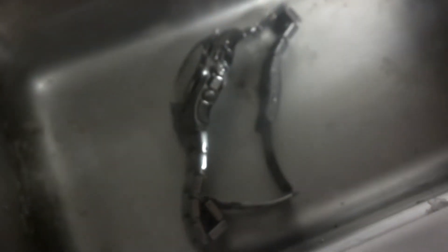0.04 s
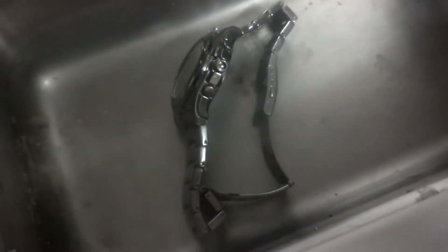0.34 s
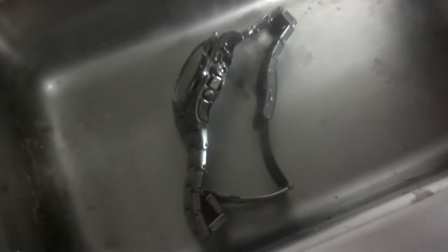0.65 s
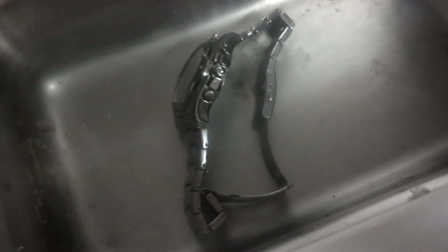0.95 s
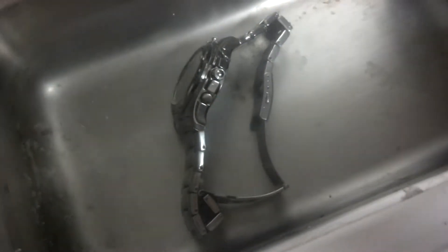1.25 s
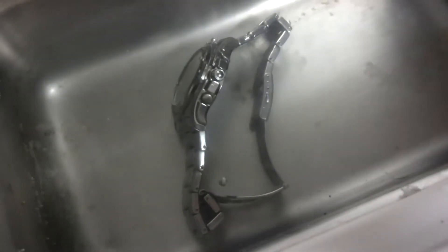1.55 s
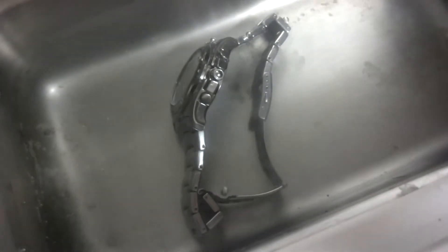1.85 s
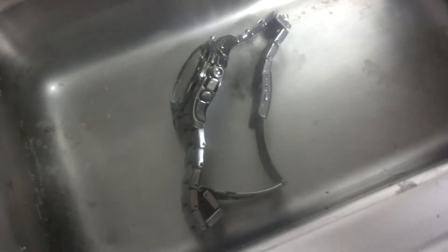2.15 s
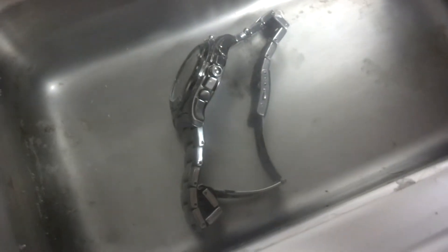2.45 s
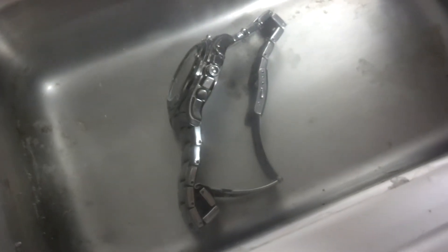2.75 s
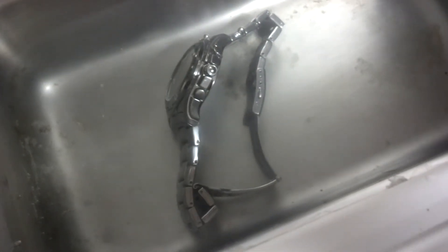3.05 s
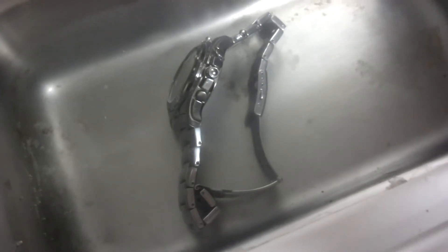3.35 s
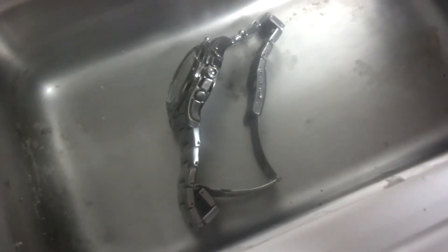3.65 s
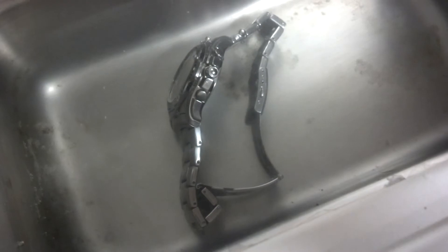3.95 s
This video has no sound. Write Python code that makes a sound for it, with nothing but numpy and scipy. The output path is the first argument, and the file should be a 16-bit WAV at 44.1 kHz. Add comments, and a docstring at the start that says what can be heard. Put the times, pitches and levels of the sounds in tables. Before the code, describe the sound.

Close above a water-filled steel tank indoors, an ultrasonic cleaner buzzes without a break while tiny bubbles hiss and crackle. A few faint ticks and brief sputters dot the buzz, the last tick landing with a small gurgle.

```python
"""An ultrasonic cleaner runs with a wristwatch in its steel tank, heard from just above the water.
From the start its drive surges twice per mains cycle: each surge gives a pressure pulse (the buzz) and
a burst of cavitation (crackle and high fizz), all wavering as the bubble cloud shifts. Larger bubbles
snap near 0.3 and 0.6 s, fainter ticks and brief sputters follow, and a last snap lands with a gurgle
near 3.7 s as the buzz runs on. Two close microphones, electronically widened."""
import sys
import numpy as np
from scipy import signal
from scipy.fft import rfft, irfft
from scipy.io import wavfile

SR = 44100
rng = np.random.default_rng(int(sys.argv[2]) if len(sys.argv) > 2 else 0)


def int16_out(signal):
    """Quantize to a 16-bit WAV file."""
    q = np.round(np.clip(np.atleast_2d(signal).T, -1, 1) * 32767)
    wavfile.write(sys.argv[1], SR, q.astype(np.int16))


N = 176400
TIME_S, FREQ_HZ = np.arange(N) / SR, np.fft.rfftfreq(N, 1 / SR)
SURGE_HZ, CAVITATION_PEAK_S = 120, 0.0019  # the drive's beat; where in each surge the bubbles peak

# Tone of one pressure pulse: frequency_hz, gain_db
PULSE_EQ = [(30, -71), (70, -35), (120, -2), (190, 9), (240, 5), (360, 2), (480, -2.5), (720, -13.5),
            (960, -20), (1320, -27), (1800, -35), (2600, -44), (5000, -71)]
# Fader ride on the pulse's round body: time_s, gain_db
BODY_RIDE = [(0.005, -40.0), (0.014, -29.5), (0.13, -28.5), (0.155, -36.5), (0.164, -47.5), (0.18, -31.0),
             (0.255, -30.0), (0.289, -29.0), (0.497, -30.0), (0.505, -38.5), (0.555, -31.0), (0.655, -32.0),
             (0.672, -38.5), (0.747, -28.5), (0.772, -30.5), (0.839, -27.5), (0.864, -33.5), (0.93, -28.5),
             (0.98, -31.5), (0.989, -40.5), (0.997, -30.5), (1.039, -27.5), (1.164, -38.5), (1.18, -31.0),
             (1.264, -28.5), (1.28, -33.5), (1.339, -29.5), (1.364, -33.5), (1.514, -30.0), (1.53, -27.0),
             (1.589, -33.5), (1.772, -26.5), (1.839, -29.0), (1.855, -38.5), (1.897, -27.5), (1.939, -36.5),
             (1.98, -30.5), (2.122, -28.0), (2.297, -32.0), (2.322, -37.5), (2.364, -28.0), (2.555, -34.0),
             (2.597, -30.0), (2.655, -34.5), (2.714, -30.5), (2.73, -33.5), (2.764, -29.5), (2.914, -39.0),
             (2.939, -29.0), (3.064, -28.5), (3.089, -35.5), (3.105, -25.5), (3.13, -34.0), (3.247, -31.0),
             (3.272, -34.5), (3.314, -26.5), (3.322, -31.5), (3.38, -29.0), (3.405, -34.0), (3.472, -26.5),
             (3.489, -34.0), (3.53, -31.0), (3.564, -34.0), (3.68, -28.5), (3.83, -32.5), (3.847, -26.0),
             (3.989, -33.0)]
# Fader ride on its sharp edge: time_s, gain_db
EDGE_RIDE = [(0.005, -44.5), (0.014, -38.5), (0.147, -36.5), (0.164, -53.5), (0.18, -39.5), (0.239, -40.5),
             (0.247, -52.0), (0.255, -39.0), (0.28, -45.5), (0.289, -32.0), (0.58, -35.5), (0.597, -46.0),
             (0.647, -34.0), (0.664, -45.0), (0.747, -33.0), (0.98, -38.0), (0.989, -49.5), (0.997, -33.0),
             (1.089, -34.0), (1.164, -44.5), (1.18, -33.5), (1.255, -32.0), (1.339, -41.0), (1.355, -34.5),
             (1.522, -33.5), (1.655, -37.5), (1.805, -34.5), (1.864, -39.0), (1.889, -35.5), (2.039, -33.5),
             (2.047, -44.5), (2.064, -29.5), (2.08, -36.5), (2.297, -34.0), (2.314, -45.0), (2.372, -32.5),
             (2.414, -45.5), (2.422, -35.0), (2.589, -39.0), (2.614, -50.5), (2.647, -37.0), (2.722, -41.5),
             (2.772, -32.5), (2.839, -38.5), (2.897, -47.5), (2.955, -35.0), (2.972, -45.5), (3.03, -37.5),
             (3.039, -42.5), (3.239, -35.5), (3.405, -42.0), (3.422, -35.5), (3.48, -41.5), (3.514, -34.0),
             (3.722, -41.0), (3.772, -39.0), (3.83, -46.5), (3.839, -38.0), (3.897, -47.0), (3.989, -44.5)]
# Bite of the edge's bright tip, against the rest of the edge: time_s, gain_db
TIP_RIDE = [(0, 6), (.45, 0), (1.3, -0.5), (1.85, -3.5), (2.2, -5), (2.4, -1), (2.65, -0.5), (3.0, -1),
            (3.4, -1.5), (3.67, -1), (4, 6)]


def buzz(body_db=-22, edge_db=-32, edge_above_hz=573, tip_above_hz=1040):
    """One pressure pulse per surge; its body, its edge and the edge's tip waver separately."""
    pulse_s = np.arange(0.00545, N / SR, 1 / SURGE_HZ)
    jitter, body_scatter, edge_scatter = rng.standard_normal((len(pulse_s), 3)).T
    pulse_s = pulse_s + 15e-6 * jitter + 60e-6 * wander(pulse_s, rate_hz=24)
    body_size = follow(BODY_RIDE, pulse_s) * amp(0.45 * body_scatter)
    lean_rad = 0.25 * wander(pulse_s, rate_hz=19)  # the body's shape drifts as the cloud moves
    body = rfft(clicks(pulse_s, body_size * np.cos(lean_rad)))
    body += 1j * rfft(clicks(pulse_s, body_size * np.sin(lean_rad)))
    edge_s = pulse_s - 120e-6  # just ahead of the body
    edge_size = follow(EDGE_RIDE, pulse_s) * amp(0.7 * edge_scatter)
    edge = rfft(clicks(edge_s, edge_size))
    tip_s = edge_s + 90e-6 * wander(pulse_s, rate_hz=8.3)
    tip_waver = amp(5 * np.tanh(wander(pulse_s, rate_hz=26)))
    tip = rfft(clicks(tip_s, edge_size * follow(TIP_RIDE, pulse_s) * tip_waver))
    shape = eq_gain(PULSE_EQ, FREQ_HZ) * np.exp(-1j)  # each pulse dips a little, then shoots up
    below_edge = 1 / (1 + (FREQ_HZ / edge_above_hz) ** 6)
    below_tip = 1 / (1 + (FREQ_HZ / tip_above_hz) ** 6)
    lows = body * below_edge
    highs = (edge * below_tip + tip * (1 - below_tip)) * (1 - below_edge)
    return amp(body_db) * unit(irfft(lows * shape, N)) + amp(edge_db) * unit(irfft(highs * shape, N))


# Fader ride on the hum: time_s, gain_db
HUM_RIDE = [(0.005, -53.0), (0.089, -40.5), (0.172, -47.0), (0.205, -41.0), (0.455, -40.0), (0.672, -52.0),
            (0.805, -37.5), (1.13, -45.5), (1.155, -69.5), (1.18, -43.5), (1.539, -40.0), (1.597, -45.0),
            (1.847, -40.0), (1.914, -41.0), (2.272, -39.0), (2.33, -46.5), (2.405, -36.0), (2.464, -49.0),
            (2.614, -42.5), (2.664, -46.5), (2.805, -38.0), (2.955, -42.0), (3.155, -38.0), (3.197, -49.5),
            (3.389, -37.0), (3.622, -42.0), (3.672, -38.0), (3.989, -41.0)]


def hum(level_db=-25.5, crest_s=0.0047):
    """A round tone at the surge rate swells and fades under the buzz."""
    turns = SURGE_HZ * (TIME_S - crest_s) + 0.05 * wander(TIME_S, rate_hz=12)
    return amp(level_db) * unit(follow(HUM_RIDE, TIME_S) * np.cos(2 * np.pi * turns))


# Dark tone of the churning bubble cloud: frequency_hz, gain_db
CHURN_EQ = [(20, -34), (50, -5), (80, -0.5), (115, 6.5), (200, -0.5), (320, -0.5), (450, -3), (660, -7.5),
            (900, -12), (1400, -19.5), (2000, -30.5), (3000, -45), (6000, -55)]
# Its calm and rough spells: time_s, gain_db
CHURN_RIDE = [(0.005, -32.0), (0.197, -38.5), (0.28, -32.5), (0.322, -39.5), (0.58, -35.5), (0.764, -39.0),
              (0.989, -35.5), (1.039, -48.5), (1.297, -36.5), (1.414, -47.5), (1.539, -40.0),
              (1.622, -45.0), (1.789, -37.0), (2.022, -45.0), (2.064, -32.5), (2.13, -40.5), (2.339, -42.0),
              (2.414, -36.5), (2.522, -46.0), (2.58, -37.5), (2.68, -43.5), (2.78, -34.5), (2.88, -43.5),
              (2.922, -39.0), (3.18, -35.0), (3.255, -44.0), (3.339, -36.5), (3.372, -42.5), (3.464, -35.0),
              (3.539, -39.0), (3.739, -36.0), (3.78, -42.5), (3.839, -35.0), (3.964, -38.5), (3.989, -34.0)]


def churn(level_db=-30):
    """The churning bubble cloud makes uneven low pressure bumps between the pulses."""
    bumps = bursts(peak_s=0.0023, swell_db=-1, scatter_db=2, grain_db=4)
    return amp(level_db) * unit(colour(bumps * follow(CHURN_RIDE, TIME_S), CHURN_EQ))


# Airy top of the finest cavitation: frequency_hz, gain_db
FIZZ_EQ = [(4000, -12), (8000, -57), (11200, -21), (12500, -4.5), (14000, 2), (15500, 8), (17000, 0)]


def fizz(level_db=-41.5):
    """The finest cavitation throbs as a hiss at the lower fringe of the ultrasound."""
    flutter = amp(1.4 * wander(TIME_S, rate_hz=28))
    collapses = bursts(CAVITATION_PEAK_S, swell_db=7, scatter_db=1, grain_db=-1.5)
    return amp(level_db) * spread(collapses * flutter, FIZZ_EQ, far_db=-9)


# Crisp tone of collapsing bubbles: frequency_hz, gain_db
CRACKLE_EQ = [(300, -53), (1200, 5), (2200, 2), (2900, -3.5), (4000, -4.5), (5500, -10.5), (7500, -16),
              (10000, -21), (16000, -46)]
# Fader ride on the crackle: time_s, gain_db
CRACKLE_RIDE = [(0.005, -49.5), (0.197, -55.5), (0.264, -49.0), (0.514, -56.0), (0.572, -49), (0.63, -56.0),
                (0.655, -49), (0.83, -54.0), (0.914, -51.5), (1.047, -64), (1.122, -54.5), (1.272, -58),
                (1.297, -46.5), (1.322, -58.5), (1.689, -59.5), (1.739, -50.5), (1.864, -57.5),
                (1.889, -48), (1.972, -67), (2.105, -53), (2.297, -55.5), (2.514, -58), (2.655, -48.5),
                (2.689, -65), (2.797, -49.5), (2.897, -60), (2.939, -49), (2.972, -63.5), (2.997, -50.0),
                (3.105, -62.5), (3.139, -51.0), (3.247, -52), (3.28, -64), (3.305, -54.5), (3.389, -60),
                (3.597, -52.5), (3.647, -56.5), (3.73, -53.5), (3.764, -61), (3.989, -49.5)]


def crackle(level_db=-46):
    """Bubbles collapse in a short spit on each surge, in louder and softer spells."""
    spits = bursts(CAVITATION_PEAK_S, swell_db=8, scatter_db=2, grain_db=2.4, narrowness=1.5)
    return amp(level_db) * spread(spits * follow(CRACKLE_RIDE, TIME_S), CRACKLE_EQ, far_db=-6)


# Cues for larger bubbles snapping: start_s, level_db
SNAP_CUES = [(0.286, -25), (0.567, -22), (.995, -38), (1.302, -40), (1.8836, -32), (2.062, -34),
             (2.645, -32), (3.177, -41), (3.734, -26.5)]
# Tone of one snap: frequency_hz, gain_db
SNAP_EQ = [(150, -26), (600, 21), (1500, 4), (2500, 8), (4500, -6), (9000, -51), (16000, -33)]


def snaps(decay_s=0.0012):
    """Single larger bubbles collapse, each a short puff heard as a faint tick."""
    out, t = np.zeros(N), np.arange(SR // 40) / SR
    for start_s, level_db in SNAP_CUES:
        puff = colour(rng.standard_normal(len(t)) * np.exp(-t / decay_s), SNAP_EQ)
        puff /= np.sqrt(np.sum(puff ** 2) / (decay_s * SR))
        slot = out[round(start_s * SR):][:len(t)]
        slot += amp(level_db) * puff[:len(slot)]
    return out


# Cues for sputters, from low gurgles to high spits: middle_s, length_s, pitch_hz, level_db
SPUTTER_CUES = [(.92, .026, 1050, -35), (1.125, .04, 1510, -48), (1.299, .018, 4200, -47),
                (2.064, .016, 846, -31), (2.785, .03, 1180, -41), (2.787, .016, 3500, -49),
                (2.934, .012, 3650, -46), (3.735, .012, 520, -30), (3.87, .012, 4000, -47)]


def sputters(width_hz=800):
    """For a few surges at a time the bursts set a patch of bubbles ringing."""
    drive = rfft(bursts(peak_s=0.004, swell_db=12, scatter_db=1, grain_db=1.5))
    out = np.zeros(N)
    for middle_s, length_s, pitch_hz, level_db in SPUTTER_CUES:
        ring = unit(irfft(drive / (1 + 2j * (FREQ_HZ - pitch_hz) / width_hz) ** 2, N))
        fade = np.exp(-(2 * (TIME_S - middle_s) / length_s) ** 2)
        out += amp(level_db) * ring * fade
    return out


# Low bed of room rumble: frequency_hz, gain_db
RUMBLE_EQ = [(15, -1), (60, -4.5), (200, -20), (1000, -46)]
# Even hiss of the water's surface: frequency_hz, gain_db
HISS_EQ = [(1000, 14), (4000, -6), (7500, -9.5), (10000, 5.5), (16000, -2)]


def background(rumble_db=-46, hiss_db=-64.5):
    """The room rumbles and the water hisses faintly, unrelated at the two microphones."""
    return np.array([amp(rumble_db) * unit(colour(noise, RUMBLE_EQ))
                     + amp(hiss_db) * unit(colour(noise, HISS_EQ))
                     for noise in rng.standard_normal((2, N))])


def bursts(peak_s, swell_db, scatter_db, grain_db, narrowness=1):
    """Grainy noise whose level moves by about swell_db once per surge, differently each time."""
    turns = (TIME_S - peak_s) * SURGE_HZ
    strength = np.clip(rng.standard_normal(N), -2, 2)[np.round(turns).astype(int)]
    swell = abs(np.cos(np.pi * turns)) ** (2 * narrowness)
    gain_db = swell * (swell_db + scatter_db * strength) + grain_db * wander(TIME_S, rate_hz=950)
    return unit(rng.standard_normal(N) * amp(gain_db))


def spread(drive, eq, far_db):
    """Two microphones share a rhythm but not a waveform; the first gets it at far_db."""
    scrambled = drive * rng.choice([-1, 1], N)
    return np.array([amp(far_db) * unit(colour(scrambled, eq)), unit(colour(drive, eq))])


def clicks(times_s, sizes):
    """Impulses timed more finely than one sample."""
    taps = np.floor(times_s * SR).astype(int)[:, None] + np.arange(-8, 9)
    offset = taps - times_s[:, None] * SR
    shape = sizes[:, None] * np.sinc(offset) * np.sinc(offset / 9)
    return np.bincount(np.clip(taps, 0, N).ravel(), shape.ravel(), N + 1)[:N]


def wander(t, rate_hz):
    """Smooth random motion of rms 1 at the times t."""
    slow = irfft(rfft(rng.standard_normal(N)) / (1 + (FREQ_HZ / rate_hz) ** 4), N)
    return np.interp(t * SR, np.arange(N), unit(slow))


def colour(x, eq, size=4096):
    """Plays x through an EQ curve, with no pre-ringing."""
    log_gain = np.log(eq_gain(eq, abs(np.fft.fftfreq(size, 1 / SR))))
    response = np.fft.ifft(np.exp(np.conj(signal.hilbert(log_gain)))).real
    return signal.oaconvolve(x, response[:size // 2])[:len(x)]


def eq_gain(eq, f):
    """Gain of an EQ curve at the frequencies f."""
    hz, db = np.transpose(eq)
    return amp(np.interp(np.log(f + 1), np.log(hz + 1), db))


def follow(ride, t):
    """Gain of a fader ride at the times t."""
    return amp(np.interp(t, *np.transpose(ride)))


def amp(db):
    """Decibels to gain."""
    return 10 ** (np.asarray(db) / 20)


def unit(x):
    """Scales to rms 1, so rides and EQ curves before it set shape, not overall level."""
    return x / np.sqrt(np.mean(x ** 2) + 1e-20)


def scene(far_churn_db=-12):
    """The buzz sits at the first microphone; crackle and fizz are stronger at the second."""
    first, second = crackle() + fizz() + background()
    return np.array([first + buzz() + hum() + churn() + sputters() + snaps(),
                     second + amp(far_churn_db) * churn()])


def record(dry, delay_samples=16, cutoff_hz=15780):
    """Stereo widening subtracts a delayed copy of the other microphone; then a steep high cut."""
    opposite = np.pad(dry[::-1], ((0, 0), (delay_samples, 0)))[:, :N]
    wide = (dry - opposite) * amp([[-0.18], [0.18]])  # a hair to the right
    high_cut = signal.firwin(601, cutoff_hz, window=("kaiser", 9), fs=SR)
    return signal.oaconvolve(wide, high_cut[None], "same")


dry = scene()
out = record(dry)
int16_out(out)
```